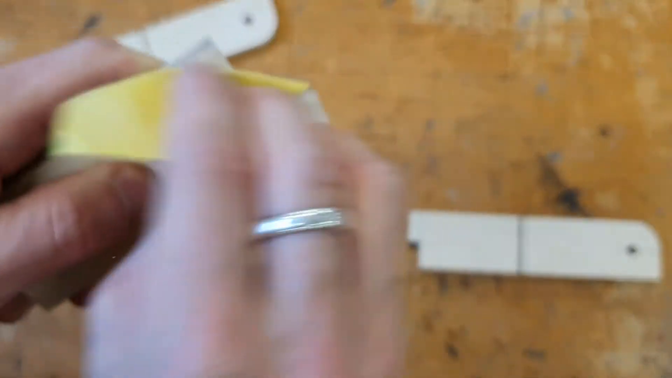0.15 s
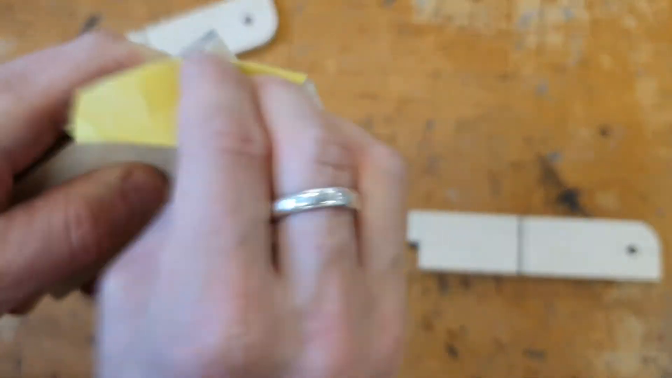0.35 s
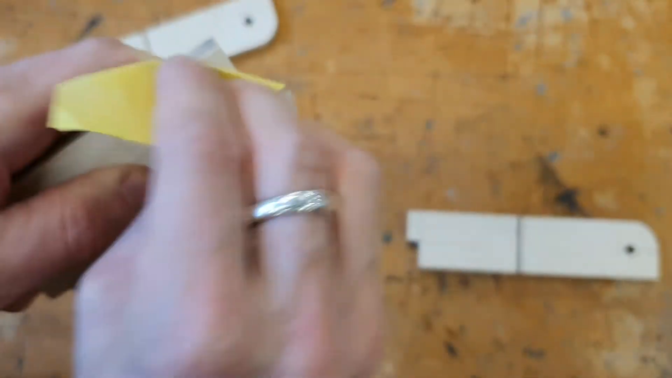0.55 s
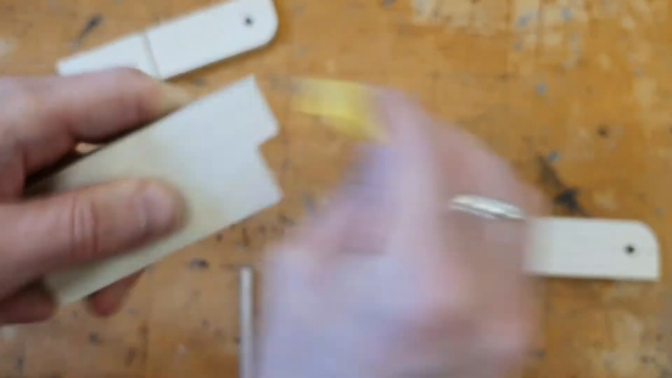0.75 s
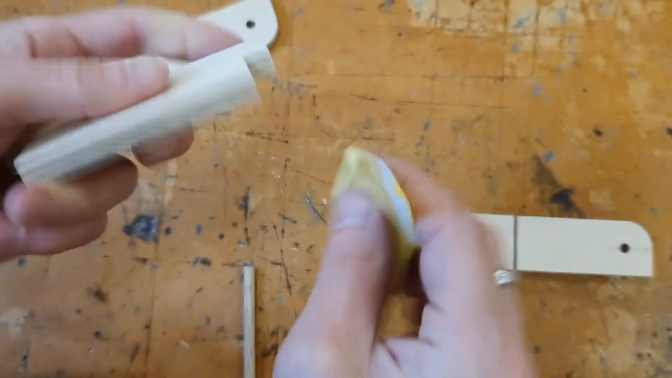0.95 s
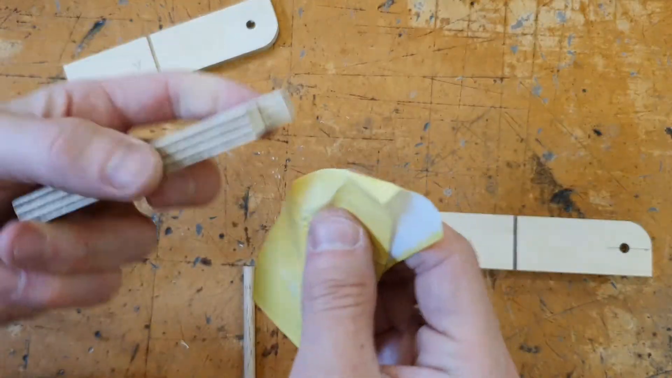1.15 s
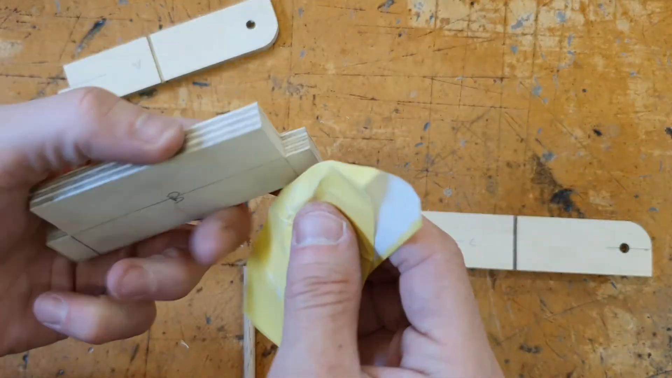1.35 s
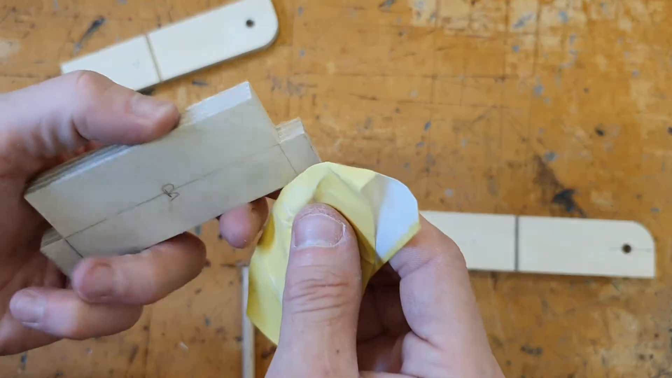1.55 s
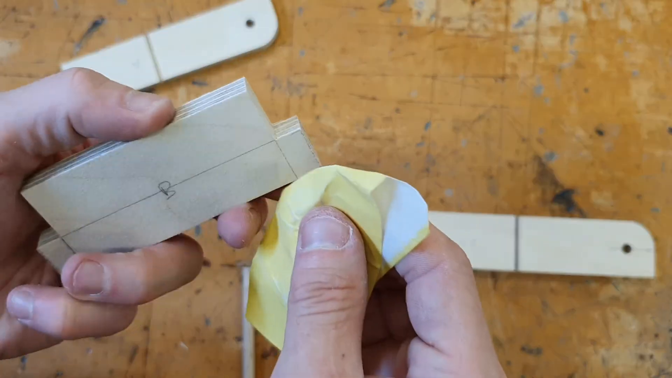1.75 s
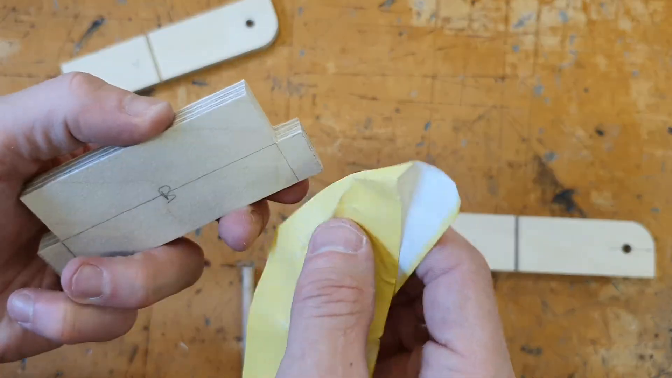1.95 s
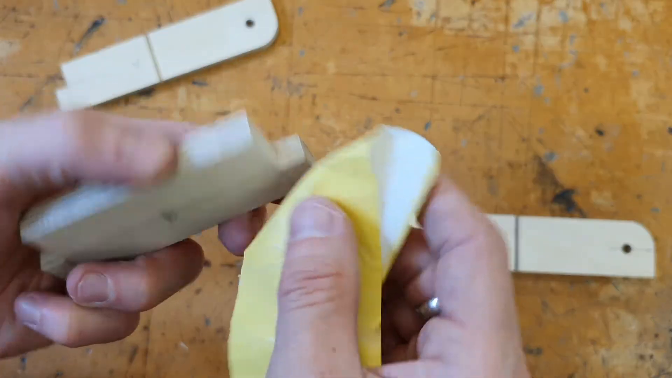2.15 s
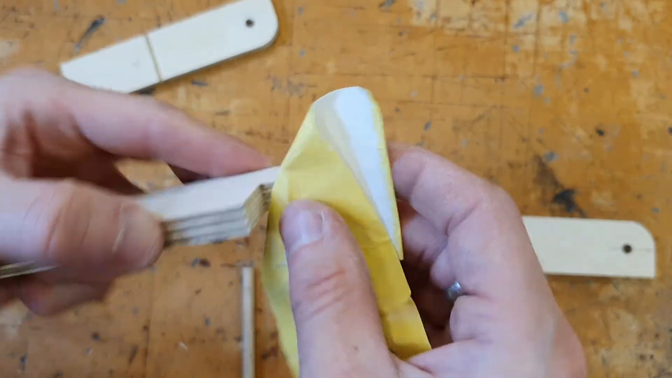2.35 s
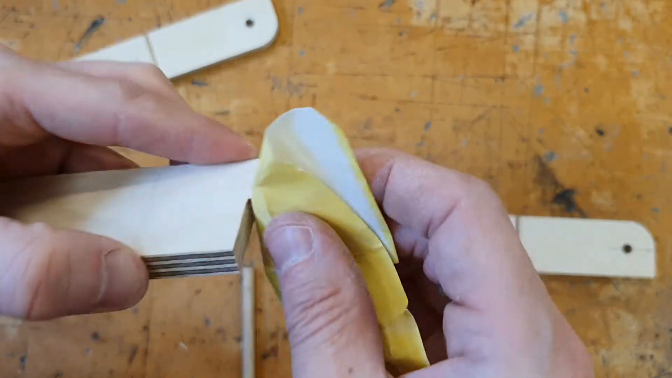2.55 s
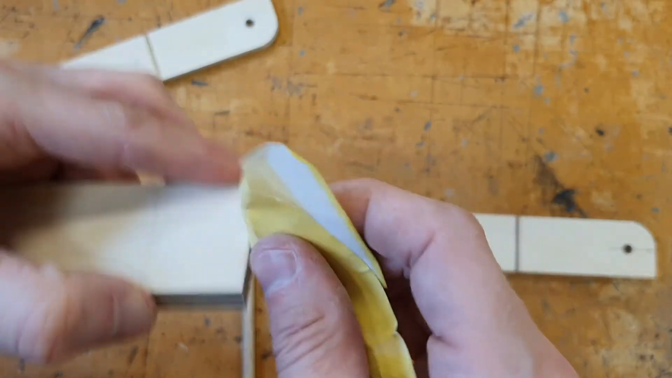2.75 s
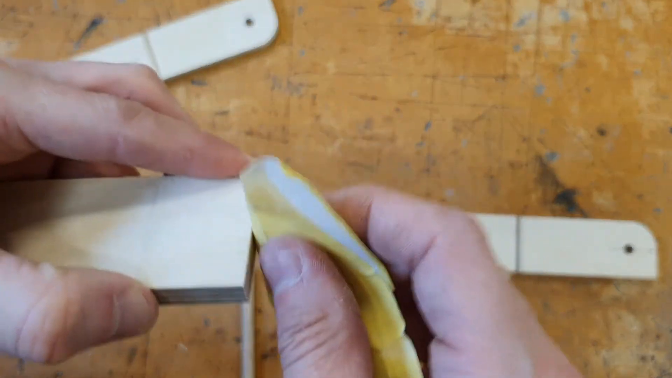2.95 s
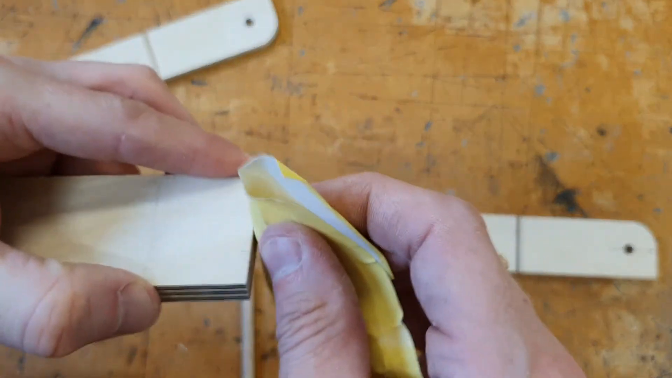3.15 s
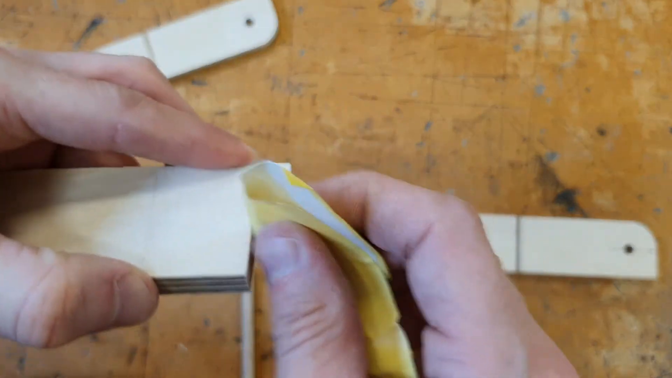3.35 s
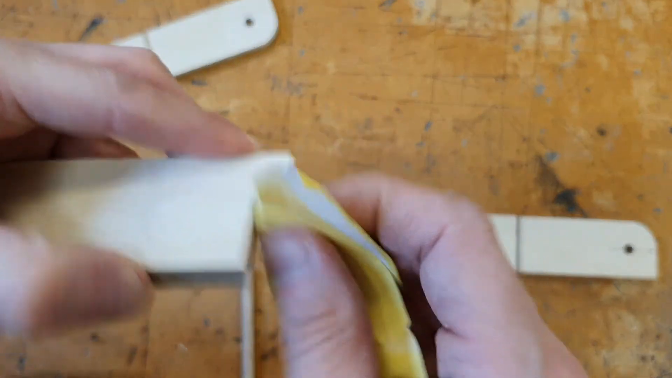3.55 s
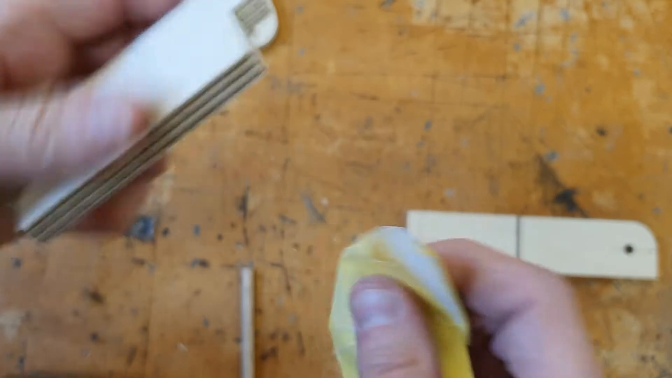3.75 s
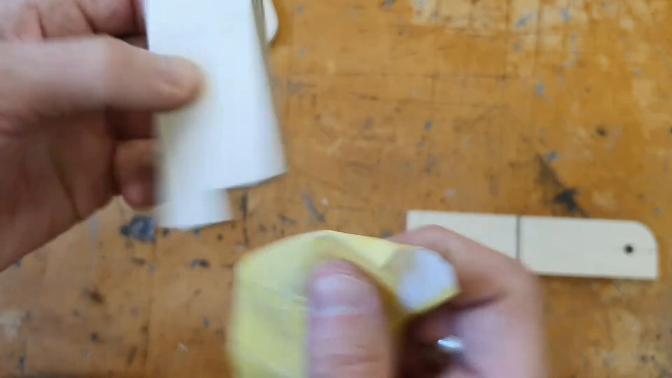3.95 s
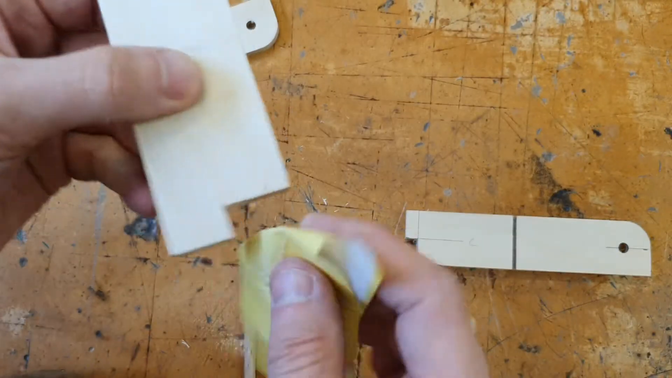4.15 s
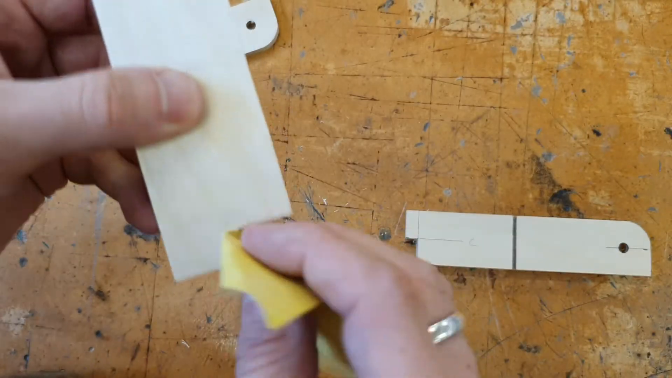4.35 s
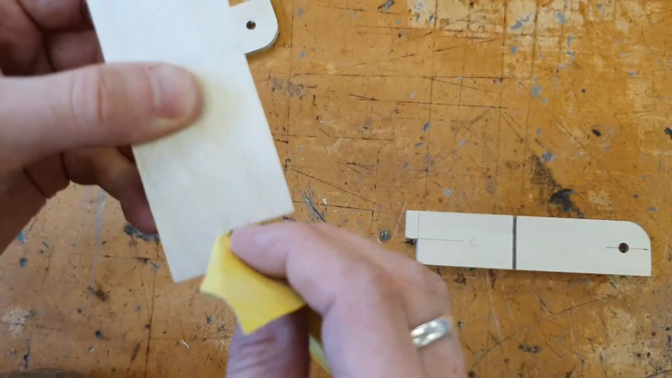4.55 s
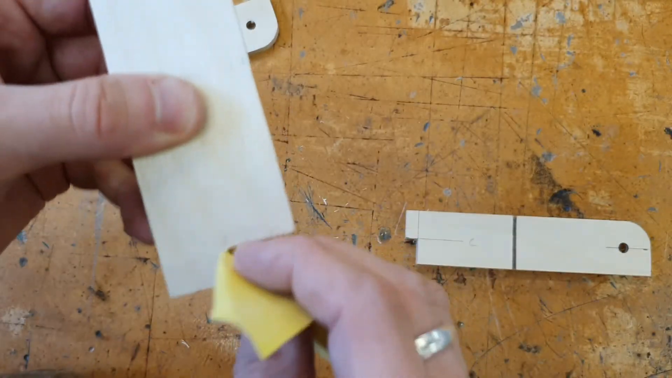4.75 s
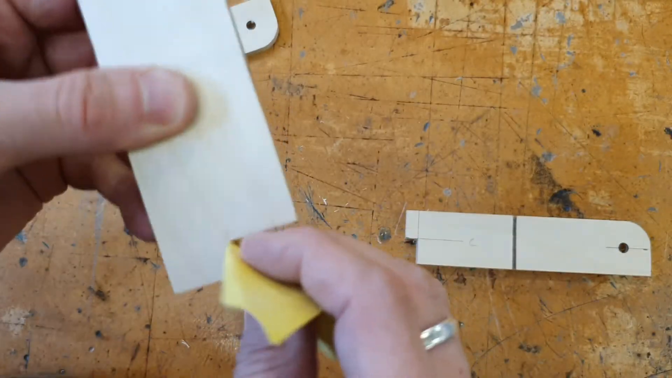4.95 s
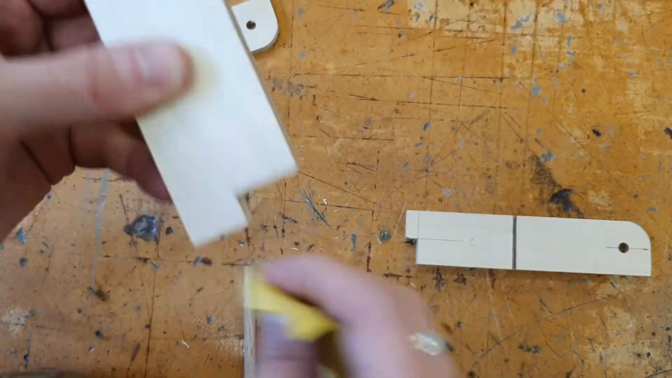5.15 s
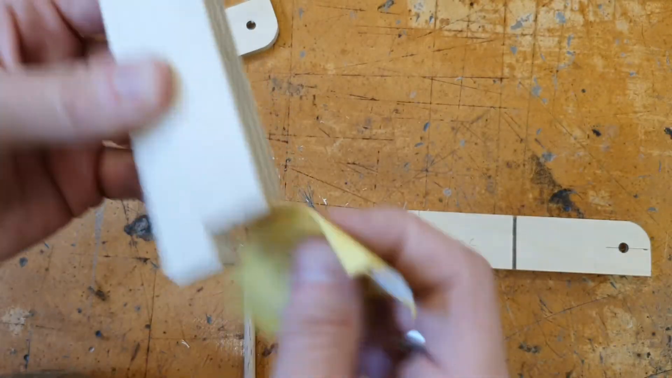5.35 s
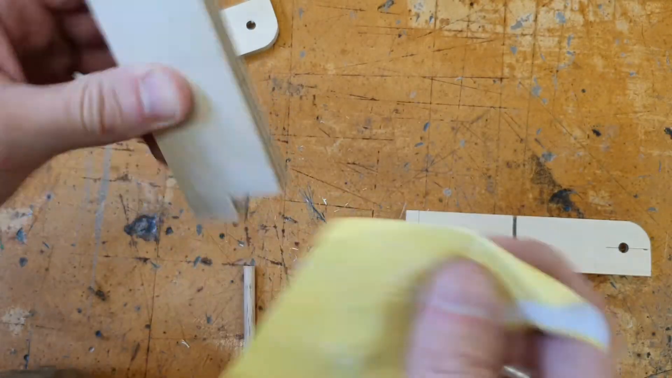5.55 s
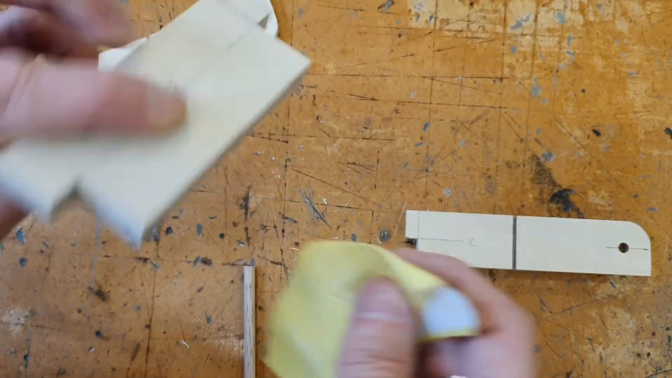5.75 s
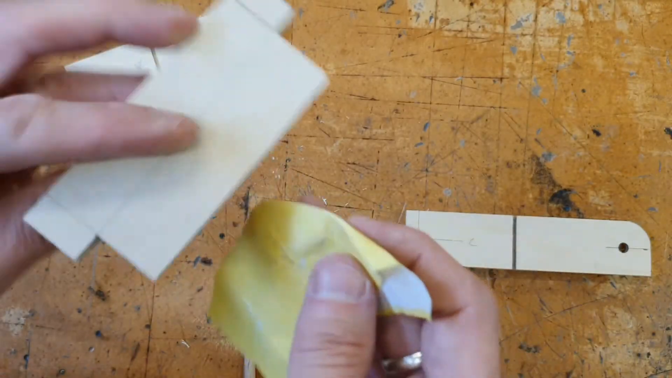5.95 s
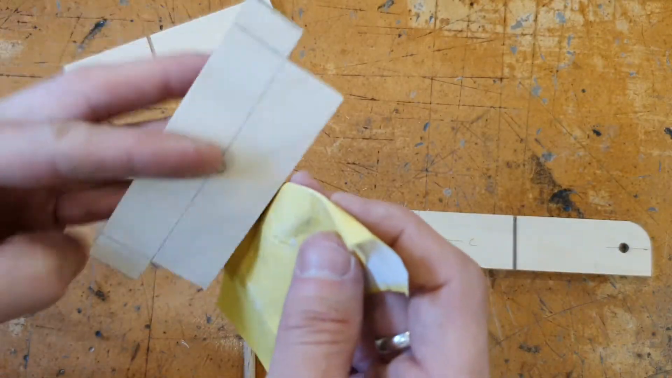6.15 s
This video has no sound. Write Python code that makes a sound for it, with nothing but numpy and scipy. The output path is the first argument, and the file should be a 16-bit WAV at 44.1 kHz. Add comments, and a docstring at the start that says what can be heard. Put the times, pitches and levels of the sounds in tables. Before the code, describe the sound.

Sandpaper rubbed by hand over a small wooden piece in three bouts of quick, hissing strokes, with paper crackles and light taps between.

```python
"""Folded sandpaper rubbed by hand over a small plywood piece, close under a stereo microphone pair.
Three bouts of quick strokes (side, end, notch) are parted by pauses in which the fingers turn the piece.
The grit hisses and makes the wood ring; the sheet buckles and whips off the edge.
The work is at a bench, mostly left of centre; behind it a bright workshop with a low hum."""
import sys
import numpy as np
from scipy import signal
from scipy.fft import rfft, irfft, next_fast_len
from scipy.io import wavfile
from scipy.ndimage import uniform_filter1d

SR = 44100
rng = np.random.default_rng(int(sys.argv[2]) if len(sys.argv) > 2 else 0)


def waveform_to_disk(signal):
    """Save audio, clipped to [-1, 1], as 16-bit WAV at the path in sys.argv[1]."""
    frames = np.transpose(np.atleast_2d(signal))
    scaled = np.clip(frames, -1, 1) * 32767
    samples = np.round(scaled).astype(np.int16)
    wavfile.write(sys.argv[1], SR, samples)


N = 272979


def gain_of(db):
    """Decibels to amplitude."""
    return 10 ** (np.asarray(db) / 20)


def unit_rms(x):
    """Scales to rms 1."""
    return x / np.sqrt(np.mean(x ** 2) + 1e-20)


def at_hz(points, hz):
    """Reads a table on a log-frequency axis."""
    f, value = np.transpose(points)
    return np.interp(np.log(hz + 1), np.log(f + 1), value)


def follow(points):
    """Reads a time curve at every sample."""
    return np.interp(np.arange(N) / SR, *np.transpose(points))


def add(mix, s, sound):
    """Mixes a sound in at time s."""
    part = mix[..., max(round(s * SR), 0):][..., :sound.shape[-1]]
    part += sound[..., :part.shape[-1]]


def filtered(x, response):
    """Applies a response given as a function of Hz."""
    size = next_fast_len(x.shape[-1] + 2048)
    return irfft(rfft(x, size) * response(np.fft.rfftfreq(size, 1 / SR)), size)[..., :x.shape[-1]]


def resonance(hz, centre_hz, width_hz):
    """Response of a damped mode, taken twice for steep flanks."""
    return (1j * hz * width_hz / (centre_hz ** 2 - hz ** 2 + 1j * hz * width_hz)) ** 2


def wobble(count, smooth_s):
    """Smoothed noise of rms 1."""
    return unit_rms(uniform_filter1d(rng.standard_normal(count), max(round(smooth_s * SR), 2)))


def swell(length, hardest, fullness=0.67):
    """Speed of a move: from rest to its hardest point and back; a lower exponent is blunter."""
    progress = np.linspace(0, 1, max(round(length * SR), 8))
    arc = np.interp(progress, [0, np.clip(hardest, .05, .95), 1], [0, .5, 1])
    return abs(np.sin(np.pi * arc)) ** fullness


def grit(count, grain, snags_per_s=9000, snag_db=4.0, clump_db=7, clump_s=0.0054):
    """Thousands of grains snag on fibres and let go, in clumps where the paper chatters."""
    size = gain_of(snag_db * np.minimum(rng.exponential(1, count), 4))
    snags = size * rng.choice([-1, 1], count) * (rng.random(count) < snags_per_s / SR)
    return snags * gain_of(clump_db * grain * np.clip(wobble(count, clump_s), -2, 2))


# spectrum of the workshop's hum and hiss: f/Hz, relative level/dB
ROOM_TONE = [(20, -27.5), (32, -16.5), (47, 5), (58, -3.5), (72, -0.5), (100, -6), (140, -13.5),
             (230, -17.5), (330, -20), (580, -25.5), (680, -29.5), (790, -25), (950, -41.5), (2000, -42.5),
             (6000, -59), (15800, -57)]
# how alike it is at the two microphones: f/Hz, likeness/0-1
ROOM_LIKENESS = [(60, 1), (300, 0.47), (900, 0.44), (2500, .05)]
# course of the low rumble: t/s, level/dB
RUMBLE = [(0.0, -62.5), (0.15, -61.5), (0.21, -54), (0.45, -71.5), (0.72, -59), (0.79, -66.5), (1.19, -54),
          (1.33, -58.5), (2.41, -58.5), (2.5, -69), (3.22, -56.5), (3.76, -63), (4.9, -61), (4.91, -53),
          (5.26, -62.5), (5.52, -53), (5.67, -67), (6.19, -63)]
def room_tone(air_db=-55.5, split_hz=200, lean_db=3):
    """A wavering rumble, much alike at both microphones, under faint steady hiss."""
    left, other = rng.standard_normal((2, N))
    alike = lambda hz: at_hz(ROOM_LIKENESS, hz)
    right = filtered(left, alike) + filtered(other, lambda hz: np.sqrt(1 - alike(hz) ** 2))
    air = filtered(np.array([left, right]), lambda hz: gain_of(at_hz(ROOM_TONE, hz)))
    air = gain_of(air_db) * unit_rms(air)
    low = filtered(air, lambda hz: 1 / (1 + (hz / split_hz) ** 4))
    rumble = unit_rms(low) * gain_of(follow(RUMBLE))
    return (air - low + rumble) * gain_of([[lean_db / 2], [-lean_db / 2]])


# decay of the room around the bench: f/Hz, t60/s
ROOM_T60 = [(200, 1), (1200, 0.2287), (3500, 0.5559), (8000, 0.5475), (15000, 0.437)]
# its tail against the close sound: f/Hz, level/dB
ROOM_SEND = [(200, -21.5), (1200, -9.5), (3000, -14.5), (8000, -13.5), (15000, -15)]
def workshop_echo(x, first_s=.006, early_db=1, early_s=0.023, count=3, sway_hz=4, lean_db=2):
    """Sparse reflections, each band dying at its own speed; the moving hands keep changing the paths."""
    t, wet = np.arange(SR) / SR, 0
    early_lift = 1 + gain_of(early_db) * np.exp(-t / early_s)
    for k in range(count):
        echoes = rng.choice([-1., 1.], (2, SR)) * (rng.random((2, SR)) < .1) * (t > first_s)
        hz, age, bands = signal.stft(echoes * early_lift, SR, nperseg=256)
        decay = gain_of(-60 * age / at_hz(ROOM_T60, hz)[:, None])
        tail = signal.istft(bands * decay, SR, nperseg=256)[1]
        share = np.sqrt(2 / count) * np.cos(np.pi * (sway_hz * np.arange(N) / SR + k / count))
        wet = wet + signal.fftconvolve(x * share, tail / np.linalg.norm(tail[0]), axes=1)[:, :N]
    wet = filtered(wet, lambda hz: gain_of(at_hz(ROOM_SEND, hz)))
    return wet * gain_of([[lean_db / 2], [-lean_db / 2]])


def off_bench(x, echo_db=-5, reach_s=.004, count=8):
    """Each microphone hears a sound directly and off hands and bench, by new paths with every move."""
    paths = np.zeros((2, round(reach_s * SR) + 12))
    for mic in paths:
        echoes = gain_of(echo_db) * rng.choice([-1, 1], count) / np.sqrt(count)
        mic[rng.choice(np.arange(6, len(mic)), count, replace=False)] = echoes
    paths[:, 0] = 1
    return signal.fftconvolve(np.atleast_2d(x), paths, axes=1) / np.sqrt(1 + gain_of(echo_db) ** 2)


# where the work is held under the pair: t/s, left minus right/dB
LEAN = [(.3, -0.5), (1.4, 9.5), (2.7, 6.5), (3.5, 7.5), (4.1, 6), (4.8, 1), (5.1, 0.5), (5.5, 8), (6.1, 9)]
# the hand shades the right microphone: f/Hz, left minus right/dB
HAND_SHADE = [(200, 2.5), (2000, 2.5), (5500, 1.5), (8500, 8.5), (12000, 5.5), (15500, 5)]
def microphones(x, lag_s=0.0001072):
    """The work lies to the left: the right microphone hears it later, weaker and duller."""
    lean = follow(LEAN)
    panned = x * gain_of([lean / 2, -lean / 2]) / np.sqrt((gain_of(lean) + gain_of(-lean)) / 2)
    def pair(hz):
        shade = gain_of(-at_hz(HAND_SHADE, hz))
        right = shade * np.exp(-2j * np.pi * hz * lag_s)
        return np.array([np.ones(len(hz)), right]) * np.sqrt(2 / (1 + shade ** 2))
    return filtered(panned, pair)


FIRM_DB = -43  # level from which a stroke counts as firmly pressed
def hands(work, thud_db=-69, smooth_s=.05):
    """The hands that push and hold thud softly, as hard as they work."""
    power = uniform_filter1d((work ** 2).mean(0), round(smooth_s * SR))
    effort = np.sqrt(abs(power)) / gain_of(FIRM_DB)
    flesh = filtered(rng.standard_normal(N), lambda hz: resonance(hz, centre_hz=95, width_hz=110))
    return gain_of(thud_db) * effort ** 0.41 * unit_rms(flesh)


# the loose sheet shifts in the fingers after a bout or a new grip: t/s, length/s, level/dB
SHIFTS = [(0, 0.0825, -61), (0.793, 0.052, -65.5), (1.16, 0.247, -78.5), (2.021, 0.128, -73.5),
          (2.27, 0.53, -79.5), (3.577, 0.427, -68.5), (3.937, 0.2605, -66), (5.2, 0.226, -69.5),
          (5.54, 0.244, -72.5), (6.098, 0.086, -76.5)]
def rustle(creep_db=-89, tilt_db=1.33, pivot_hz=5000, top_hz=13500, uneven_db=2):
    """Loose paper creeps under the fingers: a faint crackle that swells unevenly with each shift."""
    motion = np.full(N, gain_of(creep_db))
    for s, length, db in SHIFTS:
        add(motion, s, gain_of(db) * swell(length, hardest=0.23, fullness=0.72))
    motion *= gain_of(uneven_db * wobble(N, smooth_s=0.034))
    crackle = np.array([grit(N, grain=.35, snags_per_s=7000, snag_db=2.5, clump_s=.02) for mic in range(2)])
    def colour(hz):
        db = at_hz(HISS_ON_END, hz) + tilt_db * np.log2((hz + 1) / pivot_hz)
        return gain_of(db) / np.sqrt(1 + (hz / top_hz) ** 10)
    return motion * unit_rms(filtered(crackle, colour))


# bending modes of the plywood: f/Hz, width/Hz, level/dB
WOOD_MODES = [(977.6, 100, -5.5), (1437.2, 540, -1), (1609.7, 190, -5), (3078, 300, -7), (3810, 860, -9.5)]
def wood(hz):
    """Response of the piece, damped by the hand that holds it."""
    return sum(gain_of(db) * resonance(hz, f, width) for f, width, db in WOOD_MODES)


def pop(db, hz, crackle=0.19):
    """Paper or flesh gives way: a few rough swings that peak after half a cycle and die at once."""
    cycles = np.arange(round(8 * SR / hz)) * hz / SR
    envelope = (2 * cycles * np.exp(1 - 2 * cycles)) ** 2
    fuzz = wobble(len(cycles), smooth_s=0.25 / hz)
    return gain_of(db) * envelope * (np.sin(2 * np.pi * cycles) + crackle * fuzz)


# fingers and paper tap the piece: t/s, peak level/dB, contact/s
TAPS = [(1.168, -62.5, .0001), (1.1909, -40.5, 0.00037), (1.294, -50, 0.000147), (1.564, -36, 0.00016),
        (1.739, -57.5, 0.0004), (2.282, -47, 0.00019), (4.022, -38, 0.00027), (4.038, -33, 0.00035),
        (4.097, -37, 0.0012), (4.327, -61, .0002), (5.107, -34.5, 0.00018), (6.054, -58.5, 0.000233),
        (6.102, -33, 0.00018)]
def tap(db, contact_s, thud_hz=290, thud_db=-12.5):
    """A short push rings the wood, duller for a longer contact; the fingers behind give with a thud."""
    age = np.arange(SR // 10) / SR / contact_s
    ring = filtered(age * np.exp(-age * 2), wood)
    sound = gain_of(db) * ring / abs(ring).max()
    add(sound, 0, pop(db + thud_db, thud_hz))
    return sound


# the sheet buckles in small crisp creases; the low rows are dull thuds of the hand holding the piece: t/s, peak
# level/dB, f/Hz
POPS_AND_THUDS = [(.169, -23, 2040), (0.1885, -15.5, 1850), (0.1964, -10.5, 2260), (.199, -14, 1940),
                  (0.202, -16, 1193), (.382, -16.5, 2370), (0.385, -24, 2050), (.697, -38.5, 910),
                  (1.169, -40.5, 3290), (1.292, -46.5, 4970), (2.242, -47.5, 250), (2.278, -42.5, 327),
                  (2.281, -46.5, 3500), (2.518, -31.5, 4830), (3.069, -36.5, 3940), (3.085, -33, 5000),
                  (3.5751, -13.5, 4470), (3.828, -45, 397), (4.109, -35, 322), (5.039, -21.5, 2800),
                  (5.3758, -26.5, 3280), (5.392, -37.5, 144), (5.4917, -28, 294.4), (5.492, -31.5, 810),
                  (5.496, -32, 1290)]
def pop_or_thud(db, hz, flap_ratio=0.214, flap_db=-28):
    """A crease of the paper snaps, or the hand thuds against the piece, jolting it into a lower, weaker flap."""
    sound = pop(db + flap_db, hz * flap_ratio)
    add(sound, 0, pop(db, hz))
    return sound


# the sheet slides over an edge: t/s, length/s, start f/Hz, end f/Hz, level/dB
WHIPS = [(0.199, 0.00592, 2610, 4550, -18.5), (0.281, 0.065, 2972, 2970, -43.5),
         (0.381, 0.0454, 3343, 3860, -33), (.482, 0.055, 3000, 2880, -41),
         (3.567, 0.01073, 2400, 1540, -40.5), (4.033, 0.0837, 1054, 850, -54.5),
         (4.985, 0.167, 2830, 2756, -43), (5.073, 0.018, 2040, 3870, -27.5),
         (5.104, 0.1296, 3000, 2520, -56.5), (5.458, 0.0458, 4260, 2020, -31),
         (5.472, 0.04, 1142, 850, -39.5)]
def whip(length, from_hz, to_hz, db, width_hz=1100):
    """Grit drives a resonance of the sheet that glides as the free span changes."""
    speed = swell(length, hardest=0.32)
    glide = np.exp(2j * np.pi * np.cumsum(np.geomspace(from_hz, to_hz, len(speed))) / SR)
    lowpass = signal.butter(2, width_hz / 2, fs=SR)
    # shifted down, smoothed and shifted back: a band that follows the glide
    band = glide * signal.lfilter(*lowpass, grit(len(speed), grain=0.34) / glide)
    return gain_of(db) * speed * unit_rms(band.real)


def sheet(x, low_hz=2300, high_hz=5200, width_hz=130, ring_db=5, count=4):
    """The folded sheet has a few resonances, placed anew by each grip."""
    centres = np.geomspace(low_hz, high_hz, count + 1)[:-1]
    centres *= (high_hz / low_hz) ** (rng.random(count) / count)
    peaks = lambda hz: sum(1 / (1 + 2j * (hz - f) / width_hz) for f in centres)
    return filtered(x, lambda hz: 1 + (gain_of(ring_db) - 1) * peaks(hz))


# close hiss of the grit on each part of the piece: f/Hz, relative level/dB
HISS_ON_SIDE = [(150, -20), (330, -10.5), (600, -18.5), (850, -6), (1100, -18), (1500, -12), (2200, -8),
                (3000, -2), (3900, -4.5), (5500, -4), (7200, -10), (8600, -5), (12000, -10.5),
                (15500, -12.5)]
HISS_ON_END = [(150, -1.5), (330, -6.5), (600, -9.5), (850, -7.5), (1100, -8.5), (1500, -9.5), (2200, -2),
               (3000, -2), (3900, 1), (5500, -1), (7200, -8.5), (8600, -7), (12000, -8), (15500, -17)]
HISS_ON_NOTCH = [(150, -6.5), (330, -2.5), (600, -5.5), (850, -0.5), (1100, -6.5), (1450, -2), (1800, -4.5),
                 (2400, -10), (3100, -1), (3900, 1.5), (5500, 0), (7200, -3), (8600, -3.5), (12000, -6),
                 (15500, -16)]
def surface_at(s, end_from_s=1.0, notch_from_s=4.3, side_again_s=5.3):
    """Spectrum and swell exponent at time s: round on the long side, blunt where paper catches an edge."""
    if end_from_s < s < side_again_s:
        return (HISS_ON_END if s < notch_from_s else HISS_ON_NOTCH), 0.744
    return HISS_ON_SIDE, 0.97


def rub(s, length, hardest, db, tilt_db, wood_db, grain, pivot_hz=3800, low_hz=130, fizz_hz=7000):
    """Friction hisses through the sheet and shakes the wood, as strongly as the hand moves."""
    spectrum, fullness = surface_at(s)
    speed = swell(length, hardest, fullness)
    shared, *own = (grit(len(speed), grain) for patch in range(3))
    # the contact patch is wide, so each microphone hears the short waves of other grains
    apart = lambda hz: np.clip(0.936 * np.sqrt(hz / fizz_hz), 0, .95)
    drive = filtered(shared, lambda hz: np.sqrt(1 - apart(hz) ** 2)) + filtered(np.array(own), apart)
    def colour(hz):
        octaves = np.log2(np.maximum(hz, pivot_hz / 4) / pivot_hz)
        return gain_of(at_hz(spectrum, hz) + tilt_db * octaves) * hz ** 2 / (hz ** 2 + low_hz ** 2)
    hiss = unit_rms(filtered(sheet(drive), colour))
    fizz = filtered(hiss, lambda hz: hz ** 2 / (hz ** 2 + fizz_hz ** 2))
    hiss -= fizz * (1 - speed ** .45)  # a slow hand sounds duller
    ring = gain_of(wood_db) * unit_rms(filtered(shared, wood))
    return off_bench(gain_of(db) * speed * (hiss + ring))


# fingertips turn the piece: t/s, length/s, level/dB
SLIDES = [(1.345, 0.0254, -71.5), (1.436, 0.0416, -72.5), (1.548, 0.0388, -58), (2.36, 0.0494, -72.5),
          (4.026, 0.0416, -52.5), (4.229, 0.0305, -69.5), (6.086, 0.03665, -47.5)]
def finger_slide(s, length, db):
    """A sliding fingertip makes a dull, grainy rub with much wood in it."""
    return rub(s, length, hardest=0.692, db=db, tilt_db=-3.5, wood_db=2, grain=1)


# sanding just under the microphones: along the side, across the end, in the notch, a last side sweep
# t/s, length/s, hardest point/0-1, level/dB, tilt/dB per octave
STROKES = [ (0.076, 0.0487, 0.54, -46.5, -1.5), (0.146, 0.0364, 0.61, -41, 0),
           (0.181, 0.0697, 0.22, -33, -2), (.259, 0.0901, 0.65, -34.5, -1.5),
           (0.37, 0.0747, 0.15, -33.5, -1), (.44, 0.1006, .65, -36.5, -0.5),
           (.626, 0.07966, 0.86, -36, 0.5), (1.976, 0.0868, 0.73, -59, 5.5), (2.266, .05, 0.1, -63, 2),
           (2.488, 0.0498, 0.63, -56, -7), (2.583, 0.051, 0.26, -61.5, -3.5),
           (2.635, 0.0595, 0.61, -50.5, -.5), (2.696, 0.0696, 0.75, -46, -2.5),
           (2.814, 0.0821, 0.53, -41.5, -1.5), (2.925, 0.085, 0.85, -39.5, -1.5),
           (3.06, 0.0785, 0.76, -48, -3), (3.168, 0.076, 0.61, -42.5, -2), (3.273, 0.0291, 0.26, -42, -3),
           (3.297, 0.0821, 0.23, -39.5, -3), (3.385, 0.0733, 0.57, -42.5, -2),
           (3.511, 0.0794, 0.34, -35.5, 0.5), (3.822, 0.0834, 0.05, -57, -2),
           (4.004, 0.0513, 0.36, -48, 1.5), (4.085, 0.0321, 0.66, -53.5, 2),
           (4.415, 0.0157, 0.95, -56.5, -4), (4.438, 0.014, 0.43, -47.5, 0),
           (4.453, 0.0482, 0.5, -52, -1.5), (4.513, 0.0488, 0.26, -54.5, -1), (4.633, 0.079, 0.3, -50, -.5),
           (4.719, 0.091, 0.81, -43.5, -1), (4.857, 0.0533, 0.22, -39.5, -1),
           (4.904, 0.0395, 0.24, -53.5, -2.5), (4.957, 0.1163, 0.47, -38.5, 0.5),
           (5.071, 0.0423, 0.41, -32, 2), (5.37, 0.0524, 0.18, -49.5, -2),
           (5.42, 0.08925, 0.8, -31.5, 0.05)]
def sanding_stroke(s, length, hardest, db, tilt_db):
    """A firm stroke hisses evenly and damps the piece; a light one chatters and lets the wood ring."""
    lighter_db = max(FIRM_DB - db, 0)
    wood_db = -25.5 + 0.7863 * lighter_db
    grain = min(.1 + 0.09 * lighter_db, .8)
    return rub(s, length, hardest, db, tilt_db, wood_db, grain)


def scene():
    """Paper and wood close to the microphones, the workshop around them."""
    work = rustle()
    for source, table in (sanding_stroke, STROKES), (finger_slide, SLIDES):
        for s, *row in table:
            add(work, s, source(s, *row))
    for source, table in (whip, WHIPS), (pop_or_thud, POPS_AND_THUDS), (tap, TAPS):
        for s, *row in table:
            add(work, s, off_bench(source(*row), echo_db=-3.0))
    return microphones(work + hands(work)) + workshop_echo(work) + room_tone()


def record(dry):
    """The recorder's band limit."""
    lowpass = signal.firwin(511, cutoff=15900, window=("kaiser", 9), fs=SR)
    return signal.oaconvolve(dry, lowpass[None], "same")


dry = scene()
out = record(dry)
waveform_to_disk(out)
```